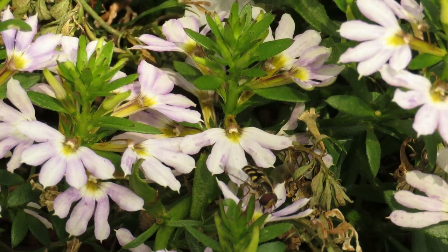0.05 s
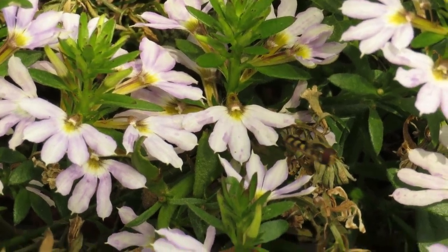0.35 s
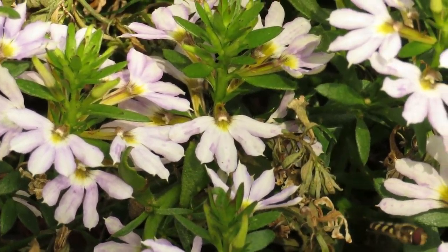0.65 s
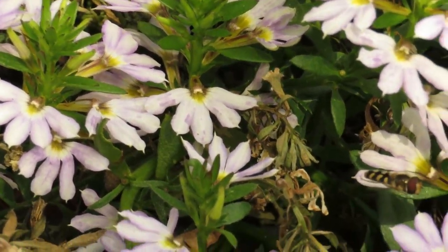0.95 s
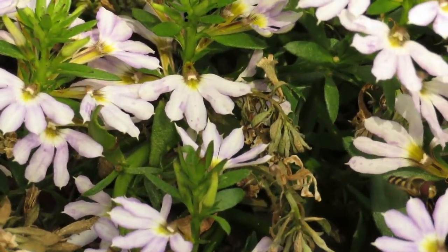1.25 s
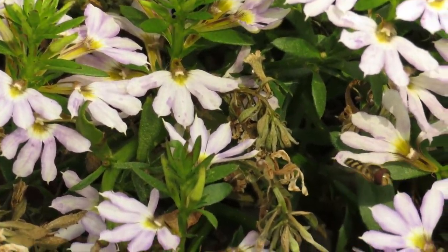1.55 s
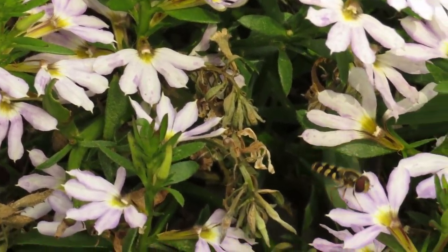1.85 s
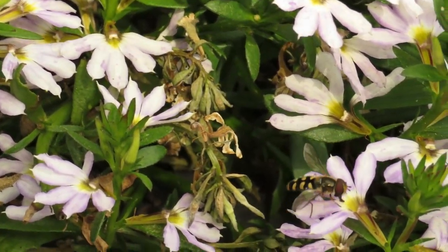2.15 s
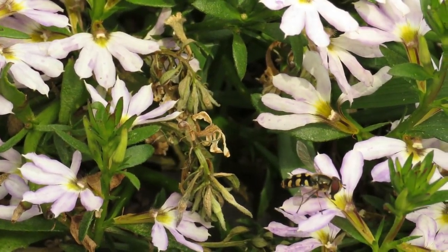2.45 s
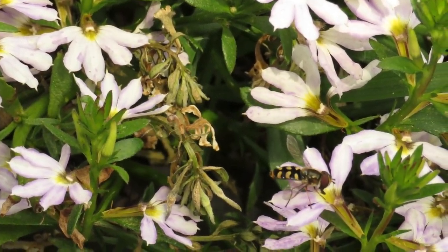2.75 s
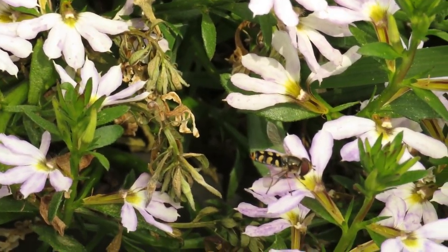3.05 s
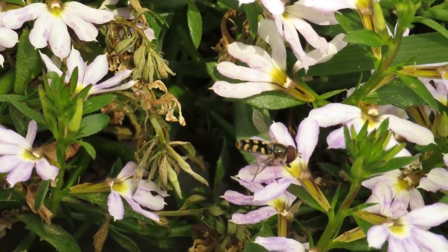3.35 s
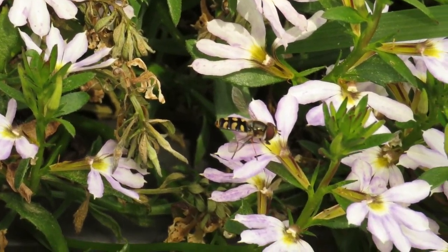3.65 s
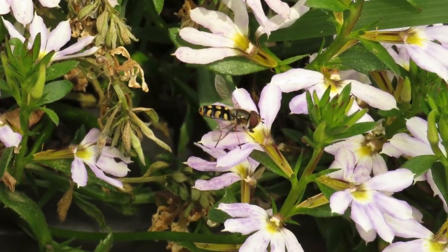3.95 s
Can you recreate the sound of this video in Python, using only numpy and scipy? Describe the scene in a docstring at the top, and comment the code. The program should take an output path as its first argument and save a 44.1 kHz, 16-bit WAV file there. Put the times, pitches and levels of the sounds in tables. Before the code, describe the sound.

Distant traffic makes a steady low wash with a faint engine drone, heard from a flower bed outdoors. Light puffs of wind bump the microphone, and a faint, quick rattle swells twice, with a few tiny ticks close by.

```python
"""A steady wash of distant traffic and a faint engine drone, heard from a flower bed outdoors.
A faint, quick rattle swells twice as uneven beats shake a ringing body. Light puffs of wind
roll across the two microphone ports as soft low bumps. A few tiny ticks sound close by,
and the tyre noise swells briefly once."""
import sys
import numpy as np
from scipy import signal
from scipy.io import wavfile

SR = 44100
rng = np.random.default_rng(int(sys.argv[2]) if len(sys.argv) > 2 else 0)


def dump_mix(stems):
    """Bounce the given channels to the path in sys.argv[1] as a 16-bit WAV at rate SR."""
    frames = np.atleast_2d(stems).T  # one column per channel
    limited = np.clip(frames, -1, 1)  # hard clip at full scale
    pcm = np.round(limited * 32767).astype(np.int16)
    wavfile.write(sys.argv[1], SR, pcm)


N = 176400

# How wide the traffic and rattle sound. Each row: frequency in Hz, width in dB.
# Width is the side (what differs between left and right) compared with the mid (what they share).
STEREO_WIDTH = [(60, -17.5), (220, -13.5), (380, -7), (650, -11.5), (1250, -12), (2300, -7), (4300, -4),
                (8000, -1), (14600, -2.5)]


def from_db(db):
    """Turn decibels into a number to multiply by."""
    return 10 ** (np.asarray(db) / 20)


def rms_one(x):
    """Scale a signal so that its average strength (rms) is 1."""
    return x / np.sqrt(np.mean(x ** 2) + 1e-20)


def seconds():
    """The time of every sample."""
    return np.arange(N) / SR


def at_hz(points, hz):
    """Read between a table's rows at one frequency, with octaves evenly spaced."""
    frequencies, values = np.transpose(points)
    return np.interp(np.log(hz), np.log(frequencies), values)


def drift(rate):
    """Smooth random wandering of about 1 either way; a higher rate wanders faster."""
    pole = np.exp(-80 * np.pi * rate / SR)
    white = rng.standard_normal(N // 40 + 2002)
    slow = signal.lfilter([1], [1, -2 * pole, pole * pole], white)[2000:]
    return np.interp(np.arange(N) / 40, np.arange(len(slow)), rms_one(slow))


def band_noise(low_hz, high_hz, order=2, channels=1):
    """Noise between two frequencies, with strength 1."""
    band = signal.butter(order, [low_hz, high_hz], "band", fs=SR, output="sos")
    return rms_one(signal.sosfilt(band, rng.standard_normal((channels, N))))


def noise(spectrum, width, flicker_db=0):
    """Stereo noise of strength 1; each half octave has its own level, width and optional flicker."""
    edges = 20 * 2 ** np.arange(0, 10.1, .5)
    out, white = 0, rng.standard_normal((2, 2, N))
    for k, (low, high) in enumerate(zip(edges, edges[1:])):
        band = signal.butter(3, [low, high], "band", fs=SR, output="sos")
        mid, side = signal.sosfilt(band, white[k % 2])
        hz = np.sqrt(low * high)
        stereo = mid + from_db(at_hz(width, hz)) * side * [[1], [-1]]
        flicker = flicker_db * drift(rate=16) if flicker_db else 0
        out = out + from_db(at_hz(spectrum, hz) + flicker) * stereo
    return rms_one(out)


def bursts(rows, rise_s):
    """A level curve of short bursts. Each row: peak time in seconds, level in dB, fade in seconds."""
    power = np.zeros(N)
    for s, db, fall_s in rows:
        near = np.arange(max(0, int((s - 10 * rise_s) * SR)), min(N, int((s + 10 * fall_s) * SR)))
        age = near / SR - s
        power[near] += (from_db(db) * np.exp(np.minimum(age / rise_s, -age / fall_s))) ** 2
    return np.sqrt(power)


def swell(s, half_s, db):
    """A smooth rise and fall of level that peaks at s seconds."""
    return from_db(db) * np.exp(-.5 * ((seconds() - s) / half_s) ** 2)


def traffic_wash():
    """Far-off traffic blends into a broad, slightly flickering noise."""
    # The tone of the wash. Each row: frequency in Hz, relative level in dB.
    spectrum = [(20, -23), (40, -15.5), (70, -4), (130, -4.5), (210, -0.5), (290, -3), (380, -8),
                (600, -6.5), (800, -11), (1100, -12), (1600, -18.5), (2300, -29.5), (3200, -32),
                (5000, -39), (8000, -47.5), (12500, -50), (15000, -73)]
    # Its loudness over time. Each row: time in seconds, level in dB.
    loudness = [(0, -36.5), (.85, -37), (1.75, -36), (2.4, -37.5), (2.8, -37), (3.2, -36.5), (3.6, -36.5),
                (4, -36.5)]
    level_db = np.interp(seconds(), *np.transpose(loudness))
    return from_db(level_db) * noise(spectrum, STEREO_WIDTH, flicker_db=1.25)


def engine_drones():
    """Engines hum and tyres whine: narrow bands of noise that wander in pitch."""
    # The drones. Each row: pitch in Hz, band width in Hz, base level in dB, pitch wander in Hz.
    drones = [(214.3, 16, -46, 9), (302.6, 13.3, -50, 3.07), (649.5, 20.6, -55, 5.95), (947, 28, -60, 6.02)]
    # They rise and fall together. Each row: time in seconds, added level in dB.
    boosts = [(0, 0), (.9, -3.5), (1.8, 3.5), (2.4, -3.5), (2.85, 1), (3.4, -1.5), (4, 1)]
    boost_db = np.interp(seconds(), *np.transpose(boosts))
    out = 0
    for hz, width_hz, db, wander_hz in drones:
        hum = band_noise(hz - width_hz / 2, hz + width_hz / 2)
        phase = 2 * np.pi * np.cumsum(wander_hz * drift(rate=2.506)) / SR
        wandering = np.real(signal.hilbert(hum) * np.exp(1j * phase))  # slides the band up and down
        out = out + from_db(db + boost_db) * wandering
    return out


def rattle():
    """Uneven beats shake a ringing body; most are faint, but stronger ones come through at times."""
    # The body's hiss. Each row: frequency in Hz, relative level in dB.
    hiss_spectrum = [(300, -15), (1000, -8), (1500, 21), (2300, -14), (3400, -17), (4700, -21), (7000, -22),
                     (14000, -35)]
    # The notes it rings at. Each row: pitch in Hz, band width in Hz, relative level in dB.
    rings = [(944, 58, 7), (1796, 160, 2.5), (2070, 63, -8), (2540, 400, -24), (2885, 160, -4.5),
             (4090, 140, -11), (4580, 180, -15), (6200, 310, -18.5)]
    # The clear beats. Each row: time in seconds, gain on the body's sound in dB, fade in seconds.
    clear_beats = [(.113, -52, .003), (.127, -52.5, 0.0073), (1.322, -56, .002), (1.435, -50, .006),
                   (1.466, -56, 0.0018), (1.485, -52, .003), (1.567, -48, .003), (1.576, -56, .002),
                   (1.635, -59, .004), (1.701, -52, .004), (1.739, -54, 0.0037), (1.765, -48, 0.0087),
                   (1.801, -49.5, .005), (1.837, -48, .0025), (1.868, -47, .006), (2.033, -63, .005),
                   (2.631, -50, .008), (2.643, -58, .003), (2.682, -52, .003), (2.701, -47, 0.0037),
                   (2.7315, -46, .004), (2.772, -51.5, .004), (2.797, -55, .003), (2.805, -50.5, .004),
                   (2.834, -49.5, 0.0047), (2.864, -50, 0.01), (3.376, -53, .002), (3.57, -53, 0.0055),
                   (3.636, -59, .005), (3.666, -49, .003), (3.752, -53, .004)]
    # Fine crackle between beats. Each row: centre in seconds, half-length in seconds, gain in dB.
    rustles = [(1.7, 0.23, -71), (2.744, 0.12, -62.5), (3.41, 0.032, -61)]
    body = from_db(-1) * noise(hiss_spectrum, STEREO_WIDTH)
    for hz, width_hz, db in rings:
        mid, side = band_noise(hz - width_hz / 2, hz + width_hz / 2, order=1, channels=2)
        body = body + from_db(db) * (mid + from_db(at_hz(STEREO_WIDTH, hz)) * side * [[1], [-1]])
    body = signal.sosfilt(signal.butter(2, [500, 6500], "band", fs=SR, output="sos"), body)
    beats_per_s, faint_db, spread_db, fall_s = 30, -61.5, 3, 0.0041
    faint_beats = [((k + 0.12 * late) / beats_per_s, faint_db + spread_db * min(force, 1), fall_s)
                   for k, (late, force) in enumerate(rng.standard_normal((150, 2)))]
    beats = bursts(faint_beats + list(clear_beats), rise_s=0.002)
    crackle_db = 4.5 * np.minimum(drift(rate=110), 2)
    crackle = sum(swell(*row) for row in rustles) * rms_one(from_db(crackle_db))
    return body * np.hypot(crackle, beats)


def wind():
    """Each swirl of air swings the pressure at one port, then the other, and trails rough air."""
    # The swirls. Each row: time in seconds, strength in dB, pitch in Hz, half-length in cycles,
    # delay from right port to left in seconds, left minus right level in dB.
    swirls = [(0.103, -23, 101, 0.42, .005, 0), (0.141, -22.5, 79, 0.5, -0.006, 2),
              (1.130, -15, 113, 0.51, -0.00035, -3), (1.1429, -11, 148, 0.46, -0.0028, 4),
              (1.254, -19, 164, 0.36, 0.0039, -2.5), (1.278, -17, 230, 0.43, .0015, -7),
              (1.286, -9, 387, 0.83, .0012, -4), (1.288, -11, 146, 0.36, .0018, 0),
              (1.317, -20.5, 259, .5, 0.0024, -3.5), (1.374, -21, 150, .45, 0.0043, -1),
              (1.385, -17, 140, 0.46, -0.0021, 2), (1.411, -21, 175, 0.38, 0.0077, 0),
              (1.427, -20, 138, 0.31, 0.005, -4), (1.477, -23, 200, .47, -0.0018, -1),
              (2.541, -26, 88, 0.42, -0.0012, -2), (2.591, -28.5, 160, 0.31, 0.0012, -1),
              (3.6586, -21, 114, 0.53, -.003, 0)]
    # Gentle gusts. Each row: centre in seconds, half-length in seconds, level in dB.
    gusts = [(0.114, 0.055, -44), (1.156, 0.076, -39), (1.4, 0.087, -35), (1.65, 0.033, -39.5),
             (1.88, 0.087, -38), (2.57, 0.035, -34.5)]
    # The rumble of rough air. Each row: frequency in Hz, relative level in dB.
    spectrum = [(20, -28), (55, -6.5), (110, 3.5), (200, -8.5), (350, -14), (600, -41), (1500, -70)]
    # The ports mostly swing against each other. Each row: frequency in Hz, stereo width in dB.
    width = [(60, 4), (200, 3)]
    top_hz, wake_db, wake_fall_s = 506, -18.5, 0.016
    bumps, ports = np.zeros((2, N)), np.array([[.5], [-.5]])
    for s, db, hz, half_cycles, delay_s, pan_db in swirls:
        cycles = (seconds() - s - ports * delay_s) * hz
        envelope = np.exp(-.5 * (cycles / half_cycles) ** 2)
        bumps += from_db(db + ports * pan_db) * np.sin(2 * np.pi * cycles) * envelope
    bumps = signal.sosfiltfilt(signal.butter(4, top_hz, fs=SR, output="sos"), bumps + 1e-18)
    wakes = bursts([(s, db + wake_db, wake_fall_s) for s, db, *_ in swirls], rise_s=0.01)
    gusting = sum(swell(*row) for row in gusts)
    return bumps + np.hypot(wakes, gusting) * noise(spectrum, width)


def ticks():
    """Tiny bright ticks near the microphone, each a short burst of high noise."""
    # Each row: time in seconds, level in dB, fade in seconds, lowest and highest frequency in Hz.
    close_ticks = [(1.338, -58, .005, 7500, 9500), (1.799, -58.5, .006, 5800, 8500),
                   (2.862, -54, .002, 6000, 12500), (2.869, -61, .007, 6000, 14000)]
    return sum(bursts([(s, db, fall_s)], rise_s=.0008) * band_noise(low_hz, high_hz, channels=2)
               for s, db, fall_s, low_hz, high_hz in close_ticks)


def tyre_swell():
    """A narrow band of tyre noise rises and falls once."""
    return swell(s=2.85, half_s=0.04, db=-45) * band_noise(low_hz=903, high_hz=988)


def scene():
    """Far sounds and near sounds together."""
    road = traffic_wash() + engine_drones() + tyre_swell()
    return road + rattle() + wind() + ticks()


def record(dry):
    """The sound fades in quickly; the high treble is softened and the very top is cut off."""
    start_s, fade_s, soften_hz, cutoff_hz = 0.036, 0.015, 13200, 14600
    fade_in = np.clip((seconds() - start_s) / fade_s, 0, 1)
    dulled = signal.sosfilt(signal.butter(4, soften_hz, fs=SR, output="sos"), dry * fade_in)
    return signal.sosfilt(signal.ellip(10, .1, 80, cutoff_hz, fs=SR, output="sos"), dulled)


dry = scene()
out = record(dry)
dump_mix(out)
```